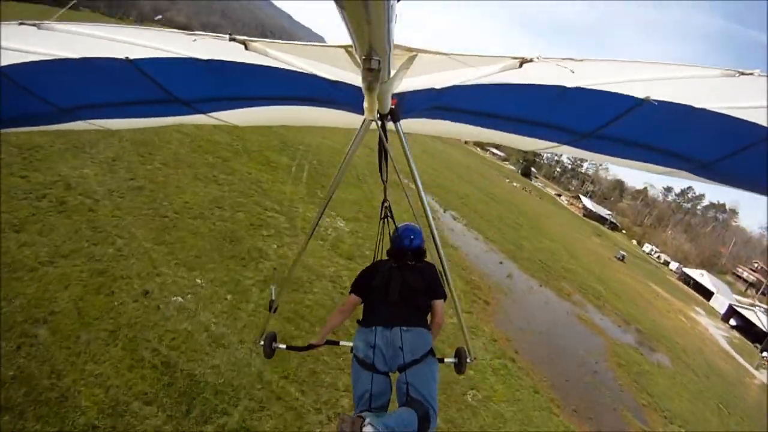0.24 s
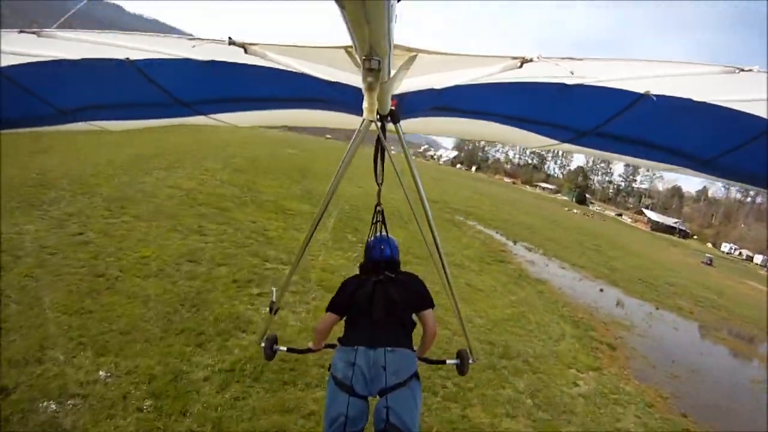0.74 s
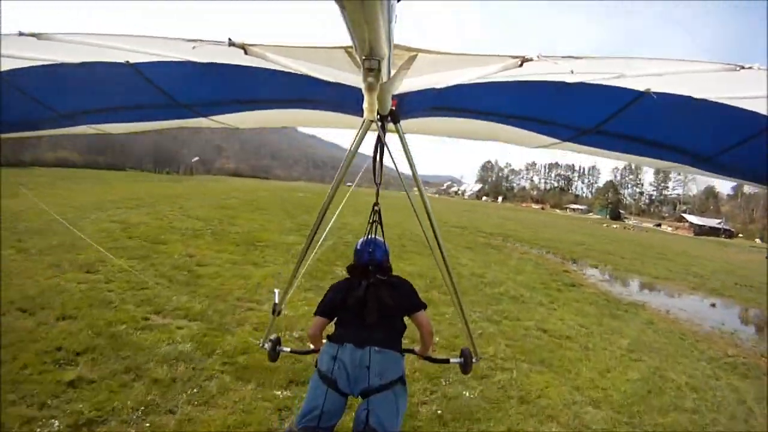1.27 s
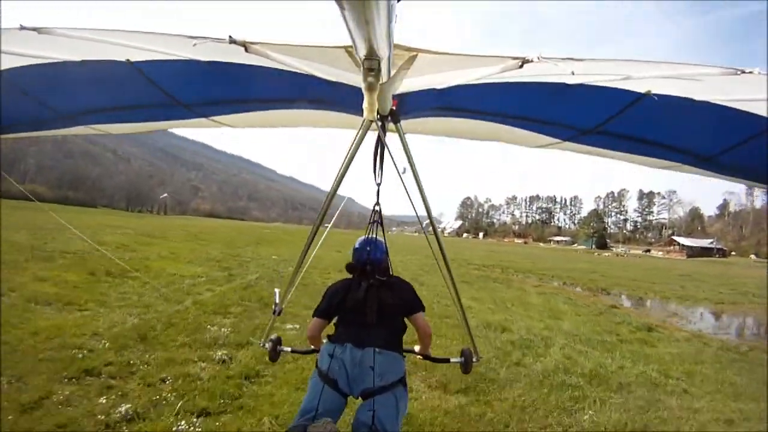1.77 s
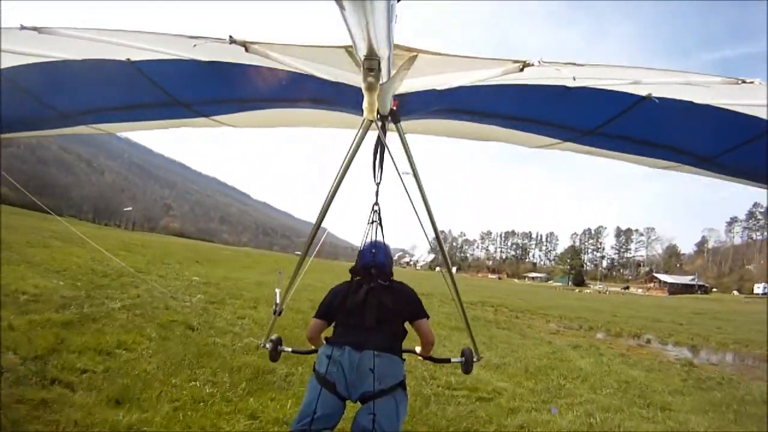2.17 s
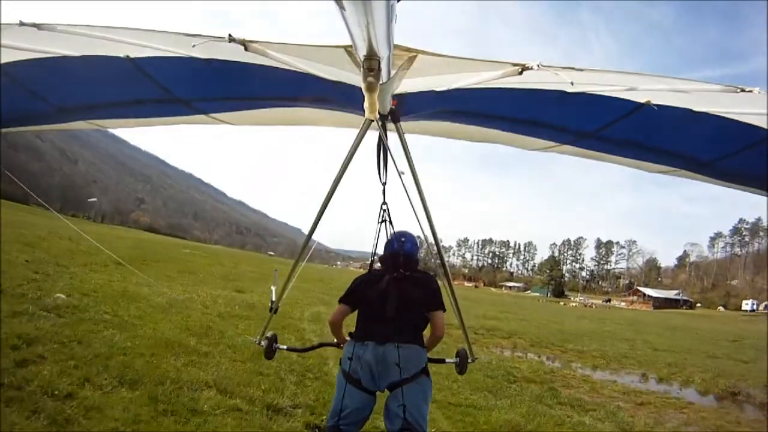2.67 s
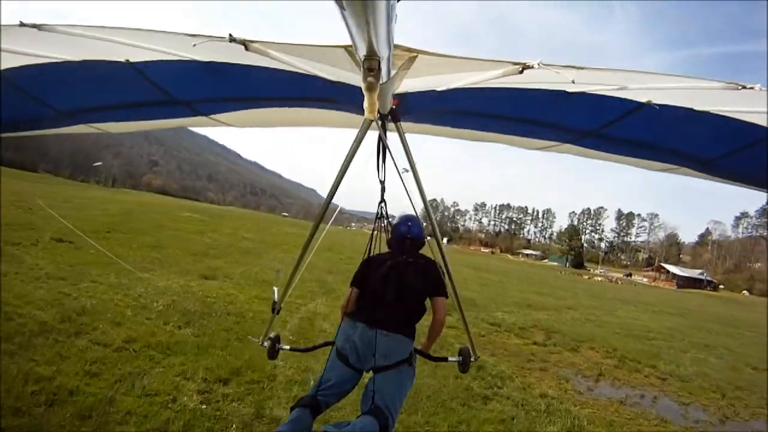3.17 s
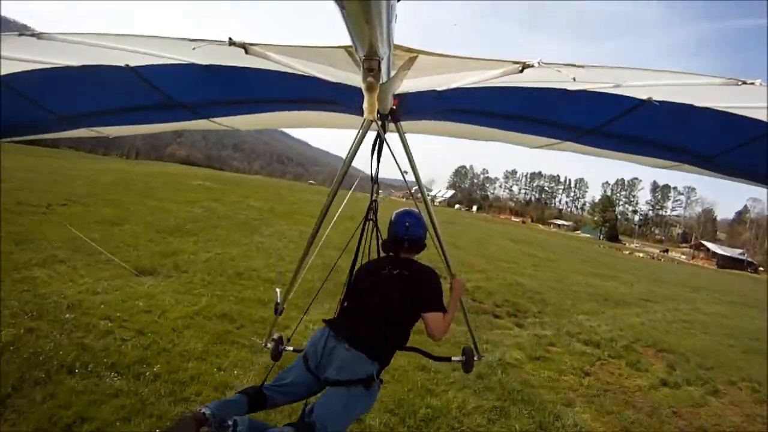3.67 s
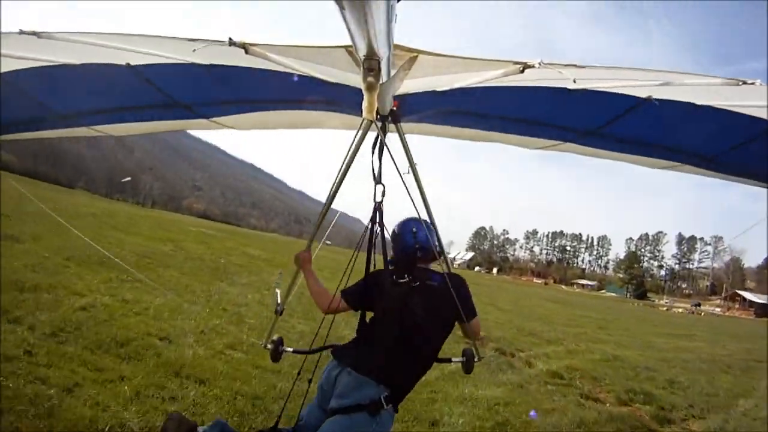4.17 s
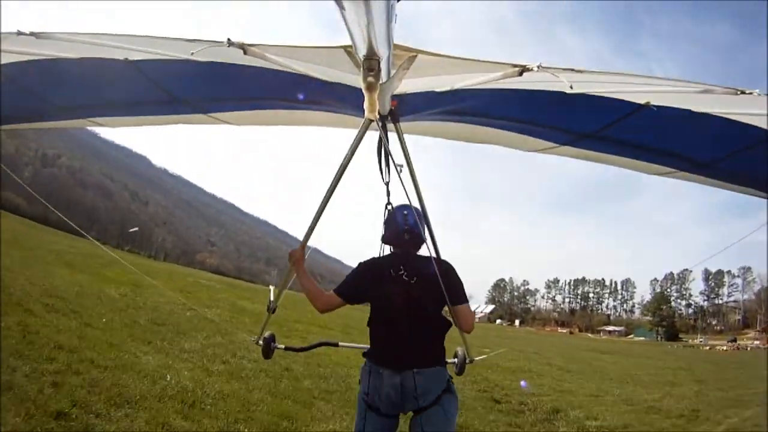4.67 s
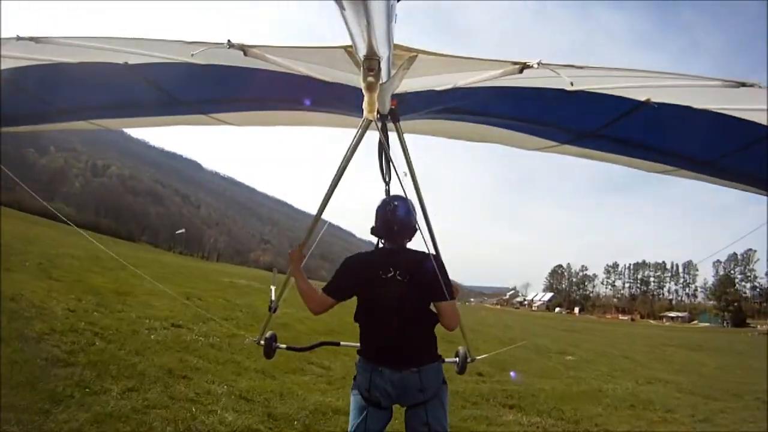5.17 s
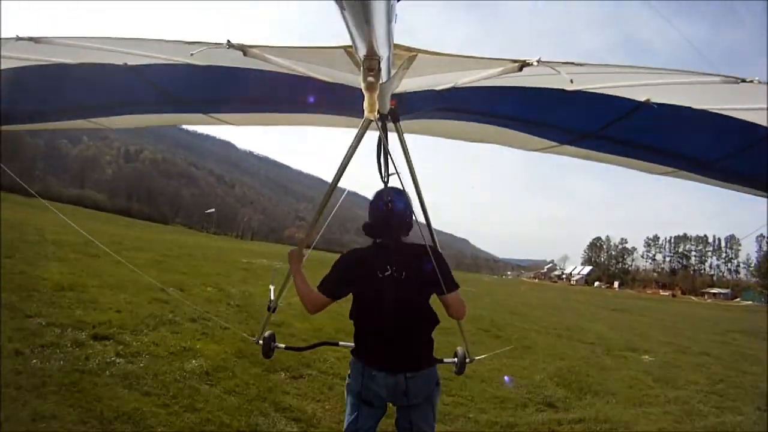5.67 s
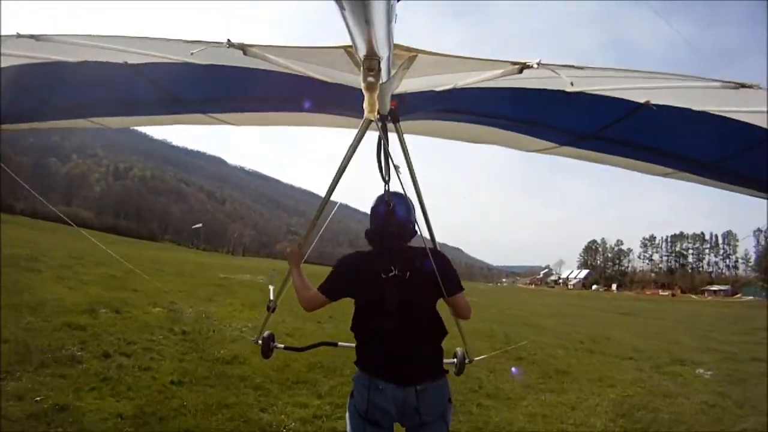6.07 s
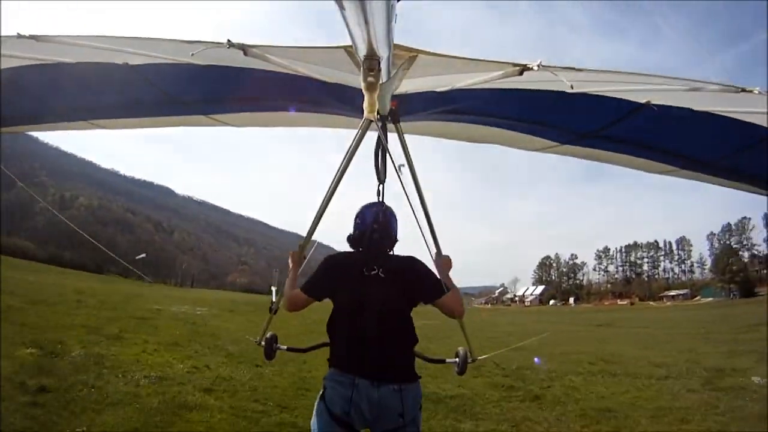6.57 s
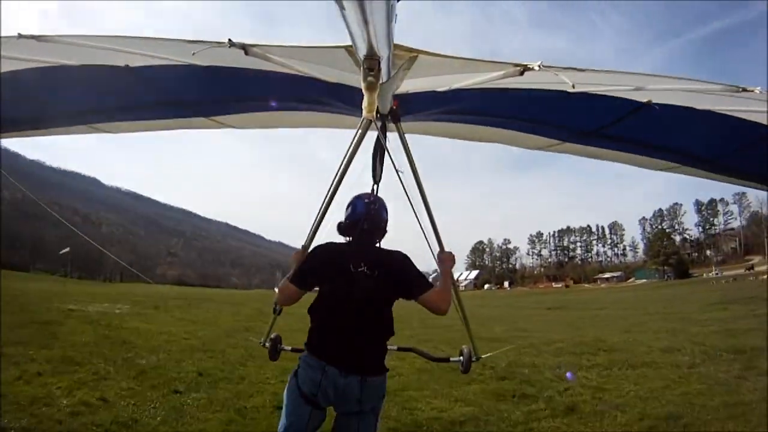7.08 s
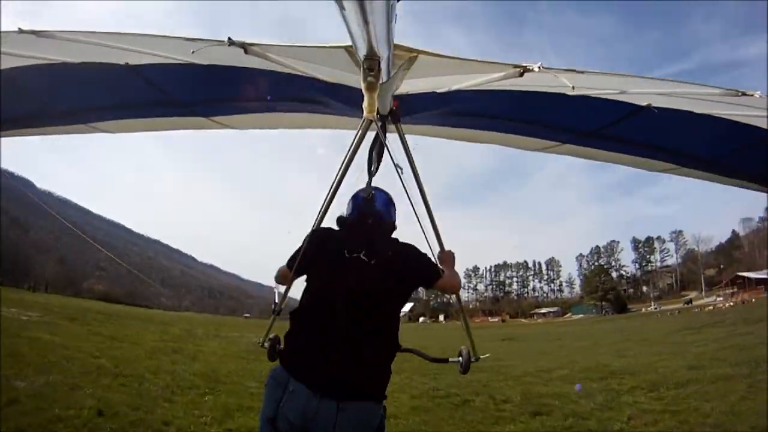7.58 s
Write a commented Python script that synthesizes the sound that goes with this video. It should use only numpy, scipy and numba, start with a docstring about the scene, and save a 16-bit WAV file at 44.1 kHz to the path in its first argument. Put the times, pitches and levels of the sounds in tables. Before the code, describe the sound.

Wind buffets a microphone inside a small plastic camera housing fixed to a hang glider in flight, a loud low rumble with a thin hiss and gusty thumps. The mount gives a few sharp ticks, then rattles and knocks in a dense cluster near the middle. Fainter ticks follow, and at the end the wind drops as a quick run of hollow knocks sounds right at the microphone.

```python
"""On the keel of a gliding wing, heard from the microphone inside a small camera's closed plastic housing.
Wind buffets the shell, roars and hisses past its seams, and strong eddies thump on it. Right at the
camera, the mount ticks, taps, snaps, rattles and knocks as the frame flexes, ringing the housing.
The recorder ducks its gain after loud peaks and holds each sample of a slow converter, so the treble
mirrors the lower bands."""
import sys
import numpy as np
from scipy import signal
from scipy.fft import rfft, irfft, next_fast_len
from scipy.io import wavfile
from scipy.ndimage import uniform_filter1d, map_coordinates
from numba import njit

SR = 44100
rng = np.random.default_rng(int(sys.argv[2]) if len(sys.argv) > 2 else 0)


def log_audio(samples):
    """Write samples as a 16-bit WAV file to the path given in sys.argv[1]."""
    # one column per channel
    frames = np.atleast_2d(samples).T
    # limit to full scale, then quantise
    limited = np.clip(frames, -1, 1)
    pcm = np.round(limited * 32767).astype(np.int16)
    wavfile.write(sys.argv[1], SR, pcm)


N = 344862

# Wind on the housing. Each row: time in seconds, then buffet, roar and seam hiss levels in dB.
WIND_LEVELS = [(0.0, -19.5, -29, -44.5), (0.13, -14.5, -29.5, -40.5), (0.27, -15, -28.5, -41.5),
               (0.39, -14, -20.5, -33.5), (0.52, -15.5, -25, -39), (1.09, -15.5, -27, -40),
               (1.26, -11.5, -20.5, -33.5), (1.62, -14.5, -23, -36), (1.78, -14.5, -24.5, -40.5),
               (2.37, -14, -29, -42.5), (2.94, -15, -31.5, -47), (3.6, -16.5, -30, -45),
               (4.1, -15.5, -30, -46.5), (4.64, -17, -32, -47), (5.05, -13.5, -26, -38.5),
               (5.4, -17.5, -30, -41), (6.55, -17.5, -28.5, -41.5), (6.85, -17.5, -35, -47),
               (7.4, -18, -33, -51.5), (7.69, -24, -36.5, -52), (7.82, -30, -30, -40)]
# The wind's four spectra. Each row: frequency in Hz, relative density in dB.
BUFFET_SPECTRUM = [(7.1, -48), (12, -3), (37, -3), (59, -0.5), (140, -3), (172, -5), (224, -8.5),
                   (330, -16), (430, -29.5), (730, -120)]
ROAR_SPECTRUM = [(120, -56.5), (200, -8), (433, -8), (508, -10), (553, -11.5), (837, -27), (1080, -30.5),
                 (1210, -29.5), (1340, -33), (1900, -36), (2470, -89), (4180, -120)]
HISS_SPECTRUM = [(1500, -62), (1900, -13.5), (2200, -11.5), (2400, -6), (2800, -7.5), (2950, -3.5),
                 (3030, 1), (3130, -9.5), (3250, -12.5), (3700, -39)]
AIRFLOW_SPECTRUM = [(700, -41), (1200, -9.5), (1800, -18.5), (3500, -5.5), (3900, -1), (4300, -9),
                    (4900, -6), (5400, -15), (5990, -23)]
# Strong eddies. Each row: time of the peak in seconds, peak in dB.
EDDIES = [(0.209, 0), (0.382, 0.5), (0.491, -2.5), (0.743, 1), (0.944, -3), (1.22, 3.5), (1.307, 11.5),
          (1.635, -9), (2.0, -1.5), (2.231, -2), (2.576, -2), (2.978, -0.5), (3.281, -1.5), (4.343, -2.5),
          (4.569, -0.5), (4.844, 2.5), (5.114, -5), (7.203, -4.5)]
# Modes of the housing around the microphone. Each row: pitch in Hz, level in dB, t60 in seconds.
HOLLOW = [(461, -12, 0.022)]
WALL = [(583, 2, 0.012), (642, 9, 0.029), (788, -2.5, 0.031)]
LOW = [(963, -4, 0.026), (1196, -5.5, 0.049), (1398, -6, 0.027), (1531, -11, 0.075)]
MIDDLE = [(2120, -1.5, 0.044), (2310, 12, 0.018), (2605, -17, 0.028), (2746, 3.5, 0.02), (3040, 1, 0.044)]
HIGH = [(3440, -12, .013), (3880, 0, .015), (4150, -2, .01), (4550, -13, .011)]
# Mount ticks. Each row: start in seconds, high modes' peak in dB, dullness (middle over high) in dB.
TICKS = [(0.306, -41, 2), (0.345, -11, -18), (0.7274, -34, 6.5), (1.8936, -10.5, -10), (2.167, -9.5, -12),
         (2.2363, -24, -2), (2.2514, -52, 17), (2.359, -11.5, -13.5), (2.9322, -42, 13.5),
         (3.0896, -46.5, 16), (3.1766, -43, 13), (3.3807, -31.5, 12.5), (3.4025, -25, -1),
         (3.4233, -22.5, 8), (3.439, -12.5, -1), (3.455, -10.5, 0), (3.4657, -8.5, -2), (3.473, -9.5, -2.5),
         (3.4868, -11.5, -6), (3.528, -20, 0), (3.5597, -21, 1), (3.579, -6, -10), (3.5919, -19.5, 9),
         (3.6133, -18, 4), (3.6248, -28, -8), (3.653, -14, -8), (3.6682, -30, 10), (3.717, -31, 5.5),
         (3.7397, -36, 8), (3.8076, -29, 8), (3.868, -34, 6.5), (3.909, -30.5, 2), (3.955, -37.5, 12.5),
         (3.9726, -32, 1), (4.0078, -34, 3), (4.0472, -31, -12), (4.1066, -29.5, -3), (4.314, -32, -6),
         (4.757, -42.5, 13), (4.797, -31.5, -1), (4.954, -32, -6), (4.986, -24, -0.5), (5.026, -33, 8.5),
         (5.3855, -29.5, -2), (5.5164, -28.5, 1), (5.54, -36, 6), (5.5798, -31, 3.5), (6.1543, -32, 6),
         (6.4676, -39.5, 15), (6.619, -33, 6.5), (7.3257, -32.5, 1.5), (7.349, -40, 3), (7.427, -26.5, -1),
         (7.446, -24.5, -2), (7.5268, -4.5, -18.5), (7.639, -37.5, 3), (7.696, -38, 5)]
# Dull taps and dry cracks of the mount. Each row: start in seconds, peak in dB.
TAPS = [(1.8941, -27), (2.9322, -29), (3.3802, -17), (3.4124, -25), (3.4401, -15), (3.5114, -27),
        (3.5276, -18), (3.5921, -18), (3.6244, -21), (3.6702, -20), (3.9722, -30), (5.5802, -28),
        (7.447, -28), (7.5266, -28)]
SNAPS = [(1.8941, -25), (3.442, -10.5), (3.4665, -19), (3.5114, -45), (3.5276, -34), (3.5534, -24),
         (3.715, -34), (3.7397, -48), (4.1066, -34), (4.5695, -46), (4.987, -29), (5.3854, -46),
         (5.5164, -46), (7.639, -55)]
# Bursts of rattle. Each row: start in seconds, seconds until the fall, level in dB, brightness in dB.
RATTLE_BURSTS = [(3.374, .055, -19, -22), (3.433, .09, -33, -0.5), (3.513, 0.017, -29.5, -8),
                 (3.578, .06, -30, -1), (3.664, 0.031, -36, -3), (3.718, .11, -38.5, -4),
                 (3.952, 0.123, -41.5, -4), (6.142, 0.039, -36, -4), (7.429, 0.036, -33, -6)]
# What the rattle rings. Each row: set of modes, level in dB, share of the brightness.
RATTLE_MODES = [(WALL, 0.33, .01), (LOW, 1.5, 0.79), (MIDDLE, 0, 0.92), (HIGH, -5.5, 1)]
# Knocks. Each row: start in seconds, the hollow's peak in dB, hardness (upper modes' gain) in dB.
KNOCKS = [(3.38, -15, -8), (3.39, -14.5, -25), (3.413, -14, -18), (3.425, -4.5, -20), (3.432, -12, -18),
          (3.484, -8, -30), (3.5, -8, -25), (7.761, -3.5, -3.5), (7.777, -3.5, -5.5), (7.7947, -2, -6),
          (7.817, -5, -9)]
# Balance of a knock, in dB: wall, low, middle, high modes.
KNOCK_MIX_DB = [-10, 2.5, .3, -1]


def amp(db):
    """Decibels to amplitude."""
    return 10 ** (np.asarray(db) / 20)


def unit(x):
    """Scale to rms 1."""
    return x / np.sqrt(np.mean(x ** 2) + 1e-20)


def wobble(rate):
    """A smooth random curve, rate knots a second."""
    return map_coordinates(rng.standard_normal(int(N * rate / SR) + 4), [np.arange(N) * rate / SR])


def filtered(x, response):
    """Pass x through a complex response of frequency."""
    size = next_fast_len(N + SR // 2)
    return irfft(rfft(x, size) * response(np.fft.rfftfreq(size, 1 / SR)), size)[:N]


def add(track, start, x):
    """Mix x into the track from start seconds."""
    part = track[round(start * SR):][:len(x)]
    part += x[:len(part)]


def turbulence(spectrum, band_hz, lumps_db, patchy_db):
    """Air noise with lumps in time and patches of random gain, rms 1 inside the band."""
    cells = signal.stft(rng.standard_normal(N + 512), nperseg=512)[2]
    patches = uniform_filter1d(uniform_filter1d(rng.standard_normal(cells.shape), 5, 0), 8, 1)
    noise = signal.istft(cells * amp(patchy_db * unit(patches)), nperseg=512)[1][:N]
    knots_hz, db = np.transpose(spectrum)
    colour = lambda hz: amp(np.interp(np.log(hz + 1), np.log(knots_hz + 1), db, -120, -120))
    air = amp(lumps_db) * filtered(noise, colour)
    return air / np.std(filtered(air, lambda hz: (hz > band_hz[0]) & (hz < band_hz[1])))


def wind(swell_db=3.5, swell_s=0.0086, airflow_db=-12):
    """Eddies push the housing in lumps; faster air roars, hisses in the seams and rushes past."""
    eddy, flutter = wobble(25), wobble(70)
    buffet = turbulence(BUFFET_SPECTRUM, (25, 250), eddy + 0.42 * wobble(5.7), patchy_db=0.1)
    roar = turbulence(ROAR_SPECTRUM, (300, 700), 1.35 * eddy + 1.35 * wobble(60), patchy_db=1.0)
    hiss = turbulence(HISS_SPECTRUM, (2200, 3200), 0.21 * eddy + 1.5 * flutter, patchy_db=2.37)
    airflow = turbulence(AIRFLOW_SPECTRUM, (4200, 5400), 0.61 * eddy + 1.5 * flutter, patchy_db=1.94)
    t = np.arange(N) / SR
    times, *levels = np.transpose(WIND_LEVELS)
    buffet_db, roar_db, hiss_db = (np.interp(t, times, db) for db in levels)
    # all but the buffet swell while a strong eddy passes
    lift_db = swell_db * sum(np.exp(-((t - time) / swell_s) ** 2) for time, _ in EDDIES)
    return (amp(buffet_db) * buffet + amp(roar_db + lift_db) * roar
            + amp(hiss_db + lift_db) * (hiss + amp(airflow_db) * airflow))


def thumps(centre_hz=93.6):
    """A strong eddy on the housing is a pull, then a push that dies away."""
    out = np.zeros(N)
    t = np.arange(-SR // 40, SR // 40) / SR
    spread = (np.pi * centre_hz * t) ** 2
    pulse = (1 - np.where(t < 0, 2.6, 1.1) * spread) * np.exp(-spread)
    for time, db in EDDIES:
        add(out, time + t[0], amp(db) * pulse)
    return out


def ring(modes, rise_s, scatter_db):
    """One blow on a set of housing modes, peak 1, pitches a little new each time."""
    t = np.arange(SR // 16) / SR
    x = np.zeros(len(t))
    for hz, db, t60 in modes:
        decay = amp(db + scatter_db * rng.standard_normal() - 60 * t / t60)
        x += decay * np.sin(2 * np.pi * (hz * rng.normal(1, 0.01) * t + rng.random()))
    x *= (1 - np.exp(-t / rise_s)) ** 2
    return x / np.abs(x).max()


def crack(t60):
    """A short bright burst of decaying noise, peak 1."""
    t = np.arange(SR // 50) / SR
    bright = signal.butter(2, [4200, 6200], "bandpass", fs=SR, output="sos")
    x = signal.sosfilt(bright, amp(-60 * t / t60) * rng.standard_normal(len(t)))
    return x / np.abs(x).max()


def ticks(low_db=-9, crack_db=-32):
    """The mount ticks as the frame flexes, ringing high, middle and low modes with a faint crack."""
    out = np.zeros(N)
    for start, db, dull_db in TICKS:
        add(out, start, amp(db) * ring(HIGH, rise_s=.0018, scatter_db=2.5))
        add(out, start, amp(db + dull_db) * ring(MIDDLE, rise_s=.0013, scatter_db=4))
        add(out, start, amp(db + dull_db + low_db) * ring(LOW, rise_s=.0013, scatter_db=5))
        add(out, start, amp(db + crack_db) * crack(t60=0.037))
    return out


def taps():
    """Dull taps of the mount ring the low modes alone."""
    out = np.zeros(N)
    for start, db in TAPS:
        add(out, start, amp(db) * ring(LOW, rise_s=.0013, scatter_db=5))
    return out


def snaps():
    """The mount cracks, close and dry, without ringing the housing."""
    out = np.zeros(N)
    for start, db in SNAPS:
        add(out, start, amp(db) * crack(t60=0.025))
    return out


def resonance(modes, hz):
    """The housing's response: one band-pass per mode, alternating in sign."""
    response = 0
    for k, (mode_hz, db, t60) in enumerate(modes):
        width_hz = np.log(1000) / (np.pi * t60)
        damping = 1j * hz * width_hz
        response += (-1) ** k * amp(db) * damping / (mode_hz ** 2 - hz ** 2 + damping)
    return response


def rattle(attack_s=0.021, fall_db_per_s=302):
    """Dense uneven contacts in the mount keep the housing ringing; each burst rises, holds and falls."""
    start, hold, db, bright_db = np.transpose(RATTLE_BURSTS)[..., None]
    t = np.arange(N) / SR - start
    bursts = np.clip(t / attack_s, 0, 1) * amp(db - fall_db_per_s * np.clip(t - hold, 0, None))
    out = np.zeros(N)
    for modes, level_db, share in RATTLE_MODES:
        contacts = rng.standard_normal(N) * amp(5.4 * wobble(150))
        ringing = unit(filtered(contacts, lambda hz: resonance(modes, hz)))
        out += np.sum(bursts * amp(level_db + share * bright_db), axis=0) * ringing
    return out


def knocks(damping_t60=0.058):
    """Knocks ring the housing's hollow and wall and, the harder they are, the modes above."""
    out = np.zeros(N)
    wall_db, *upper_db = KNOCK_MIX_DB
    upper = sum(amp(db) * ring(modes, rise_s=.0018, scatter_db=0)
                for modes, db in zip((LOW, MIDDLE, HIGH), upper_db))
    upper *= amp(-60 * np.arange(len(upper)) / SR / damping_t60)  # the pressed housing damps them
    for start, db, hard_db in KNOCKS:
        add(out, start, amp(db) * ring(HOLLOW, rise_s=.003, scatter_db=0))
        add(out, start, amp(db + wall_db) * ring(WALL, rise_s=.001, scatter_db=2))
        add(out, start, amp(db + hard_db) * upper)
    return out


def scene():
    """Wind and mount at the microphone inside the housing, in mono."""
    return (wind() + thumps() + ticks() + taps() + snaps() + knocks() + rattle())[None]


@njit
def duck(x, threshold, attack_s, release_s):
    """The recorder's gain control: turns down on peaks over the threshold, then lets go."""
    out, held = np.empty_like(x), threshold
    for i in range(len(x)):
        level = max(abs(x[i]), threshold)
        held += (level - held) / (SR * (attack_s if level > held else release_s))
        out[i] = x[i] * threshold / held
    return out


def record(dry, ceiling=.98, converter_hz=12000, top_hz=16100):
    """The camera's recorder: gain control, then a slow converter whose held steps leave mirror images."""
    x = filtered(dry[0], lambda hz: (1j * hz / (8 + 1j * hz)) ** 2)  # bass cut at 8 Hz
    x = duck(x, threshold=.44, attack_s=.002, release_s=.095)
    x = x / (1 + (x / ceiling) ** 6) ** (1 / 6)  # soft clipping
    x = filtered(x, lambda hz: np.clip((converter_hz / 2 - hz) / 120, 0, 1))  # anti-alias filter
    comb = 1 + 2 * np.cos(2 * np.pi * converter_hz * np.arange(N) / SR)  # sampling, to its first image
    band_limit = lambda hz: amp(np.interp(hz, [15150, 15500], [0, -22])) * (hz < top_hz)
    return filtered(x * comb, lambda hz: np.sinc(hz / converter_hz) * band_limit(hz))[None]


dry = scene()
out = record(dry)
log_audio(out)
```